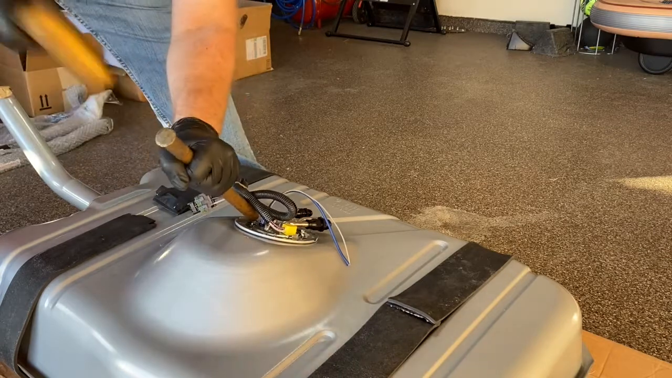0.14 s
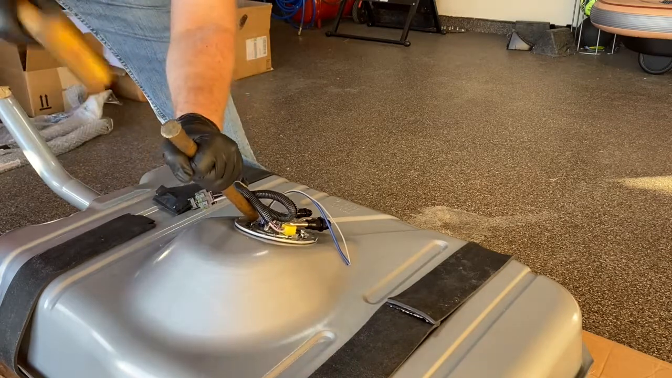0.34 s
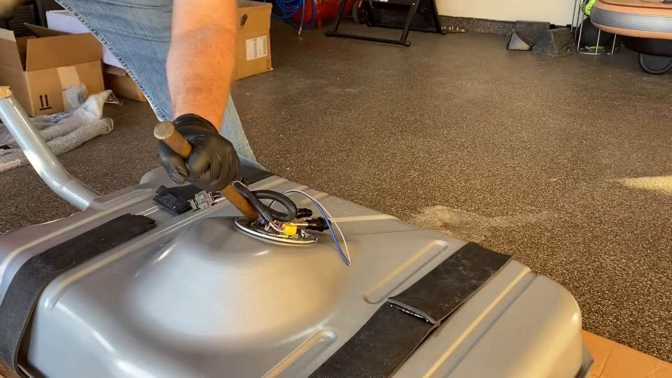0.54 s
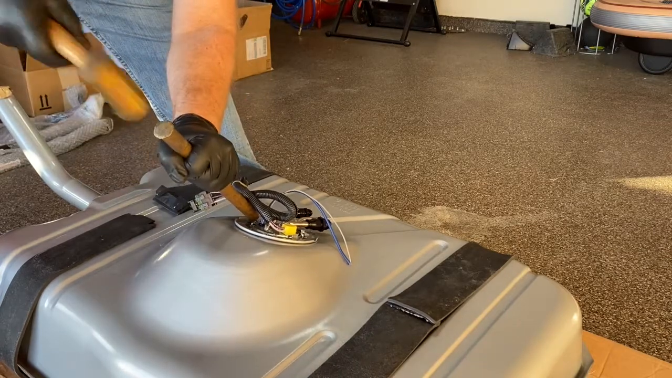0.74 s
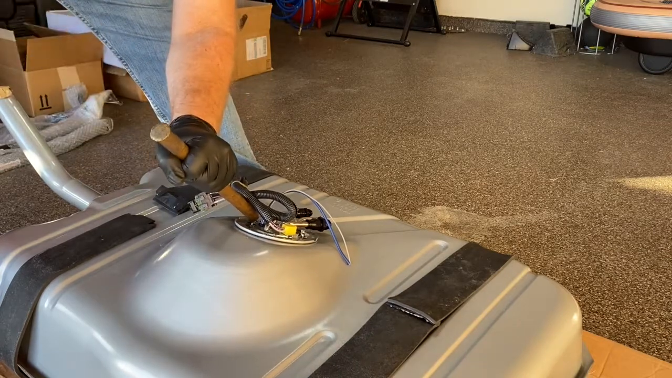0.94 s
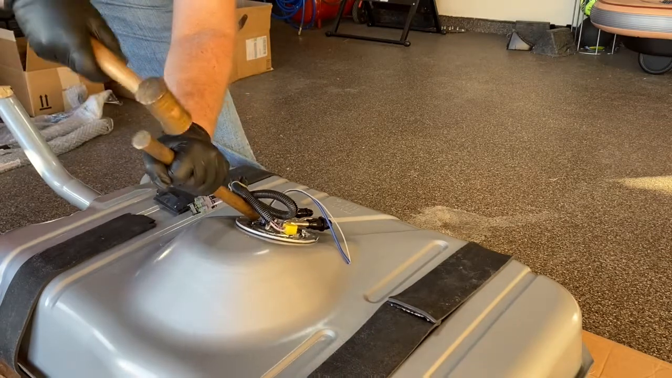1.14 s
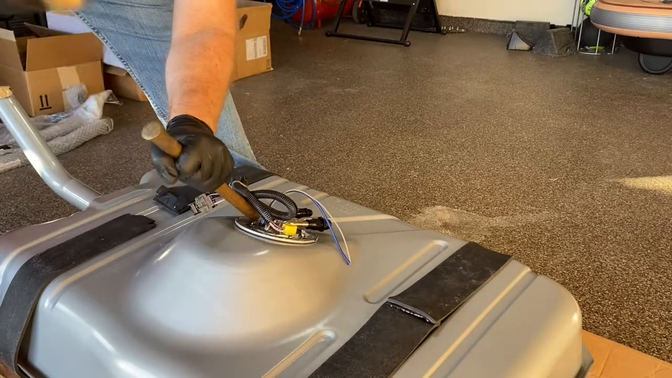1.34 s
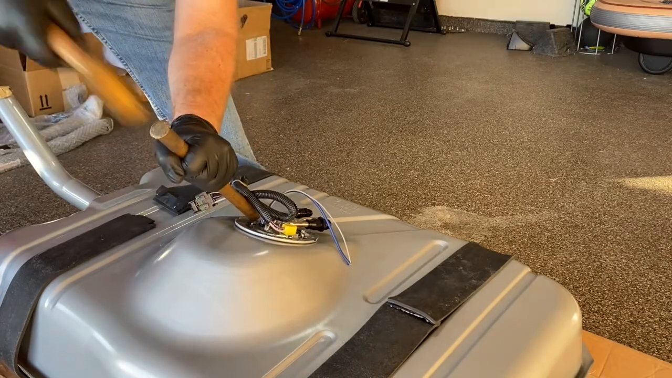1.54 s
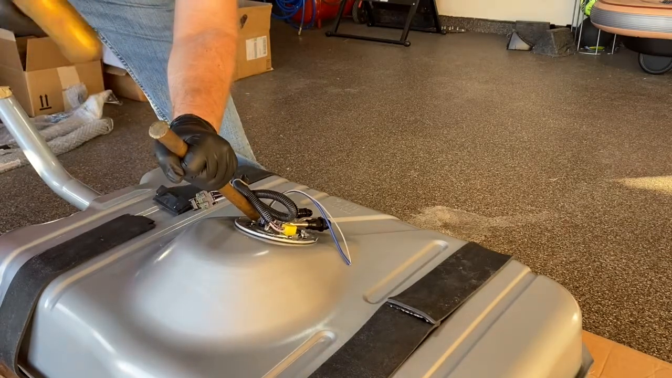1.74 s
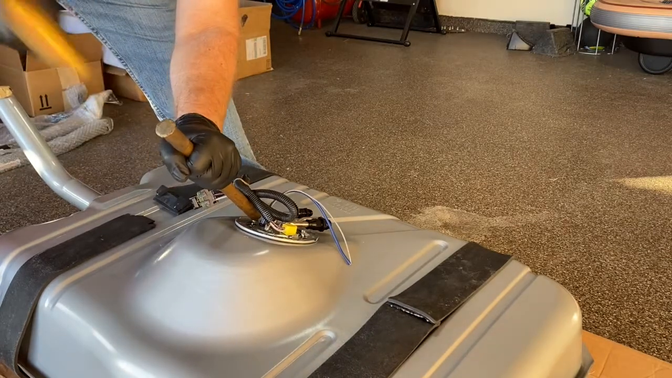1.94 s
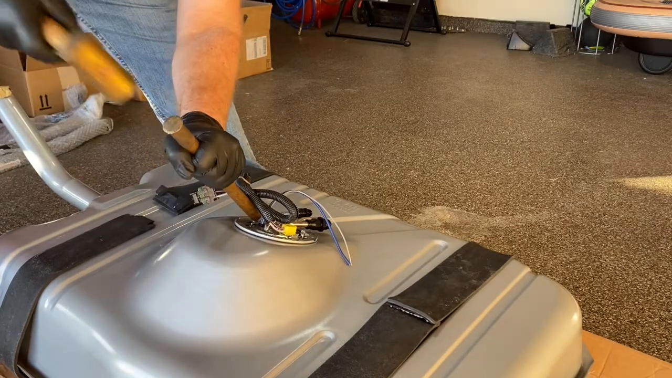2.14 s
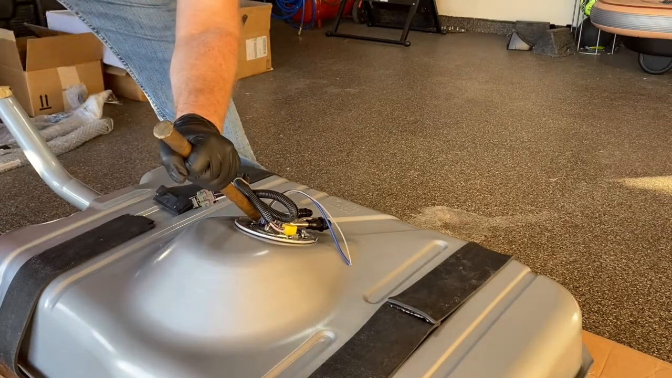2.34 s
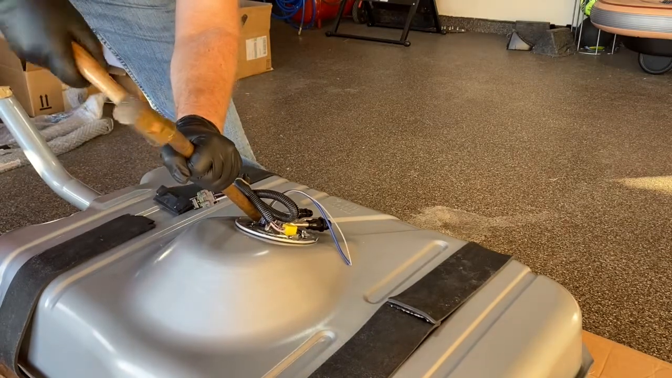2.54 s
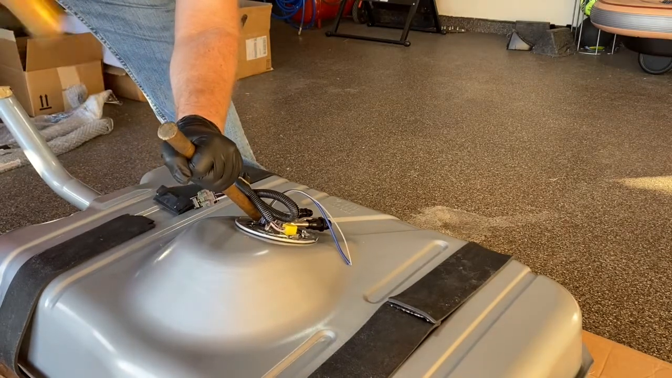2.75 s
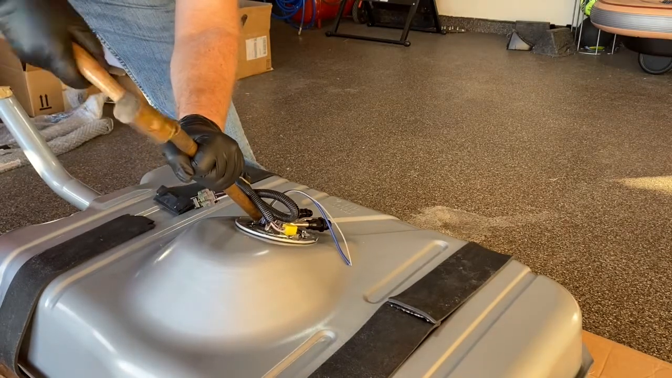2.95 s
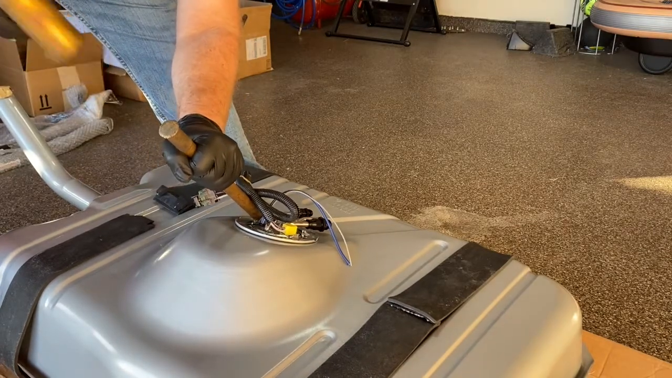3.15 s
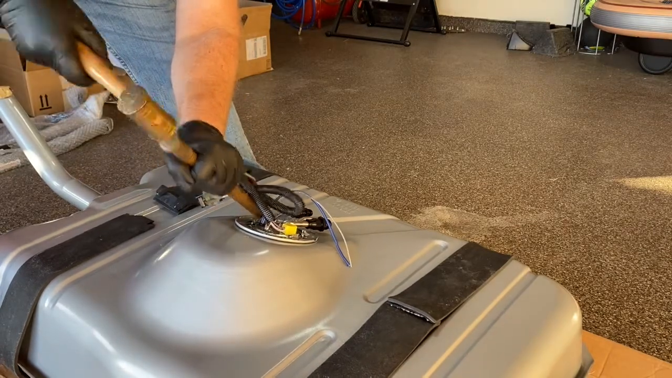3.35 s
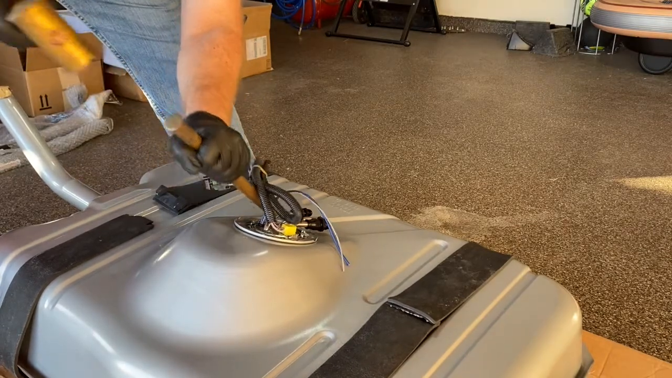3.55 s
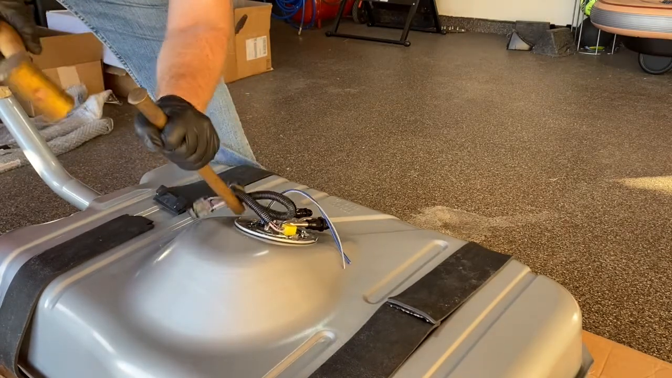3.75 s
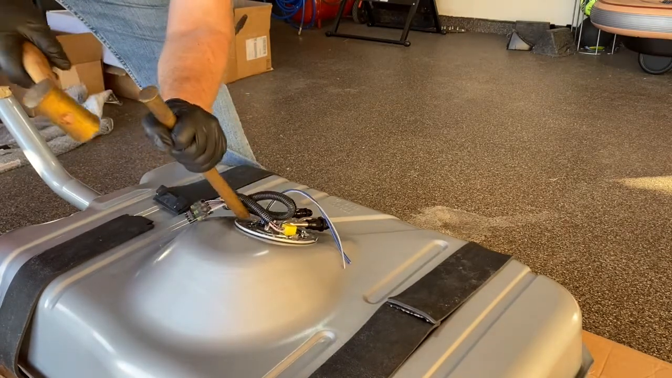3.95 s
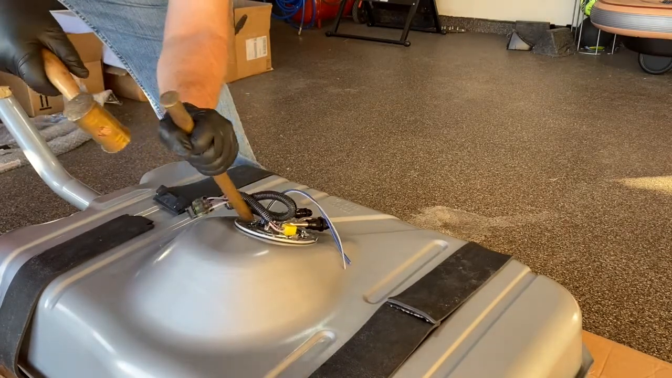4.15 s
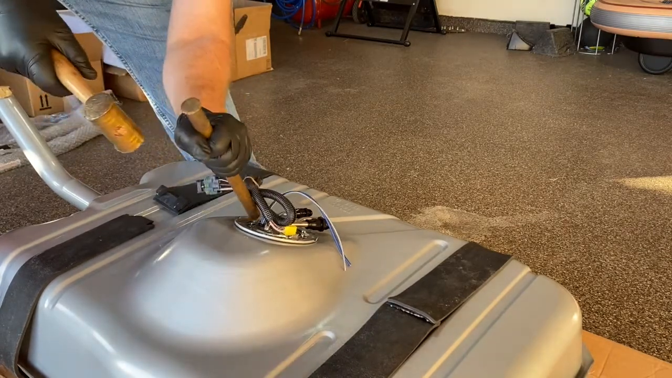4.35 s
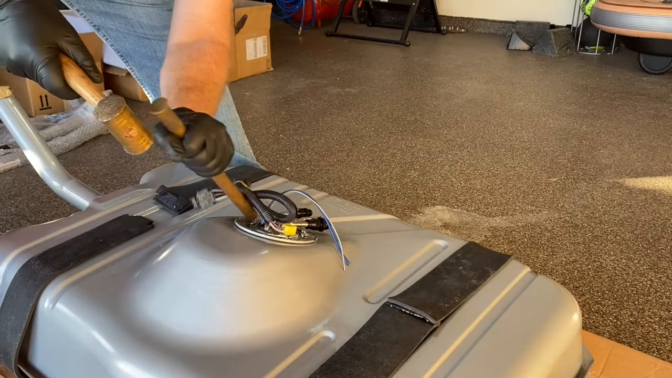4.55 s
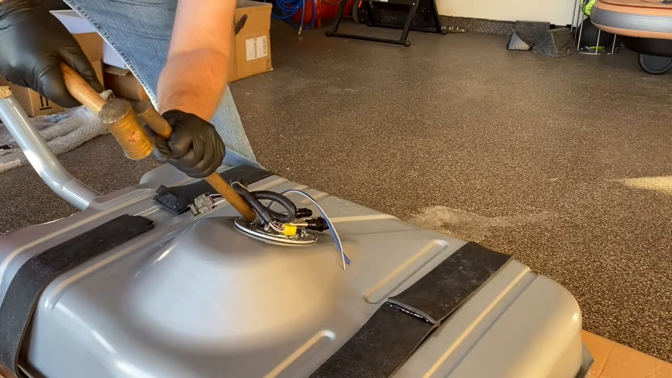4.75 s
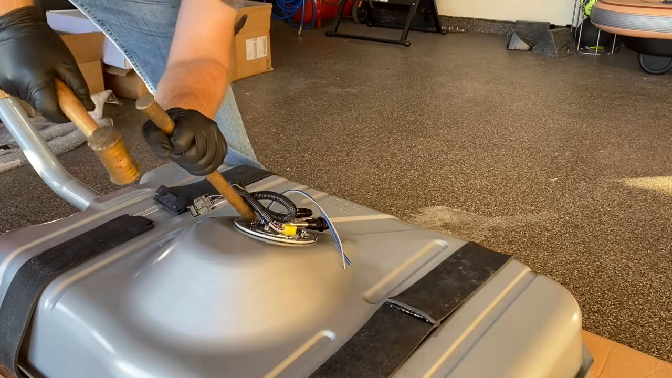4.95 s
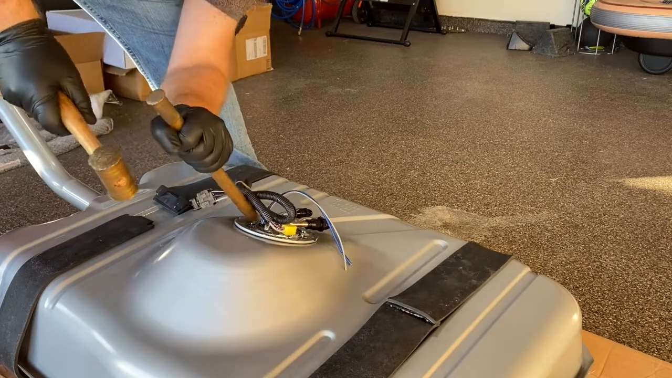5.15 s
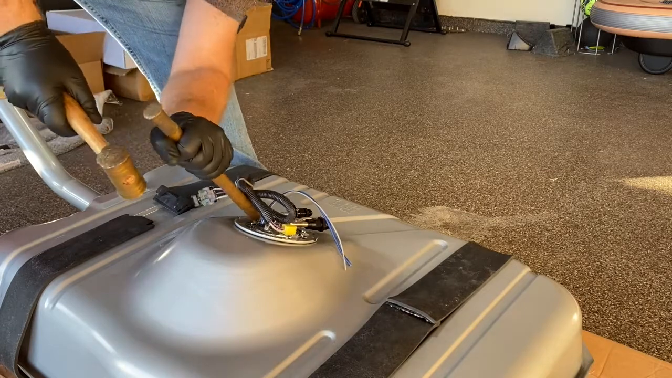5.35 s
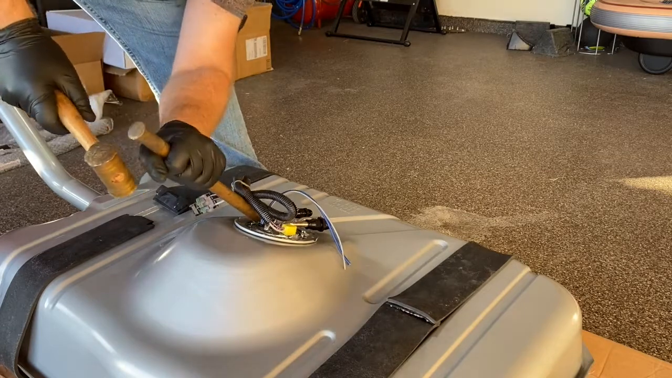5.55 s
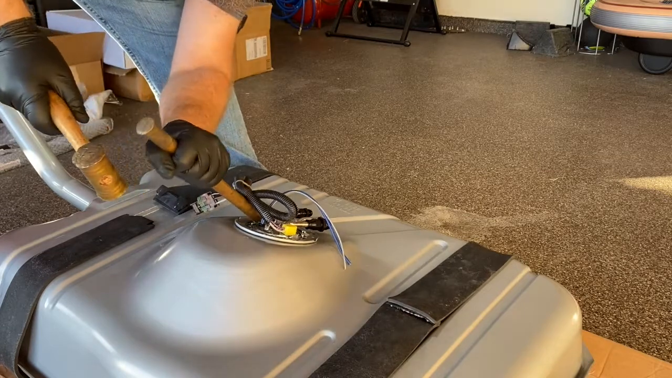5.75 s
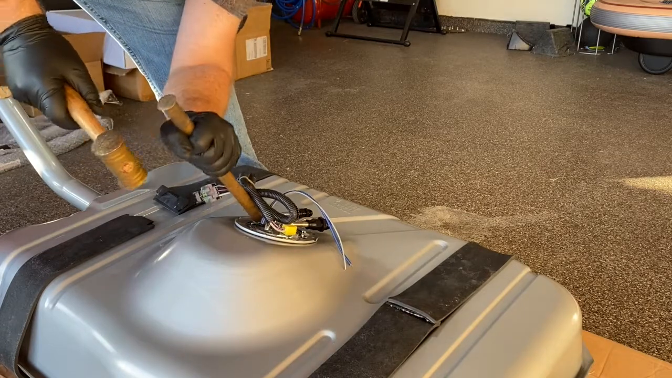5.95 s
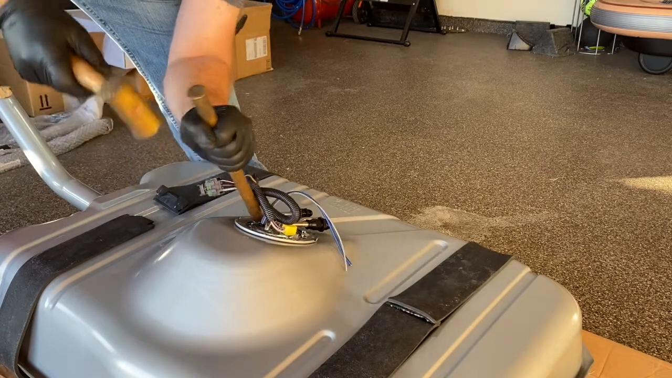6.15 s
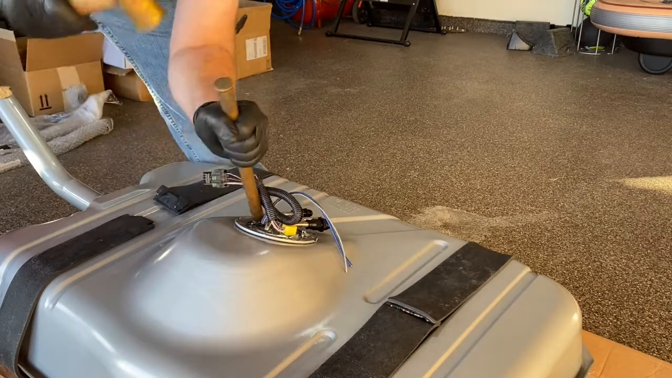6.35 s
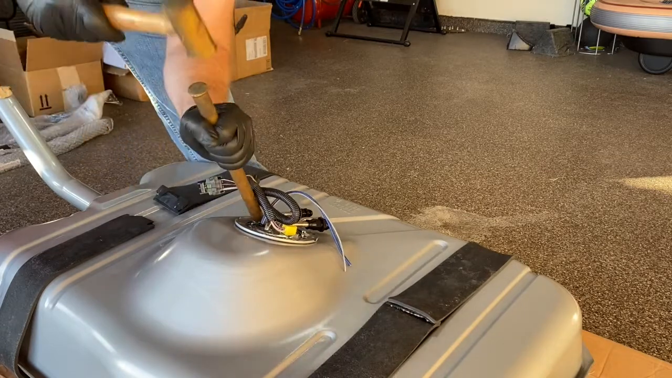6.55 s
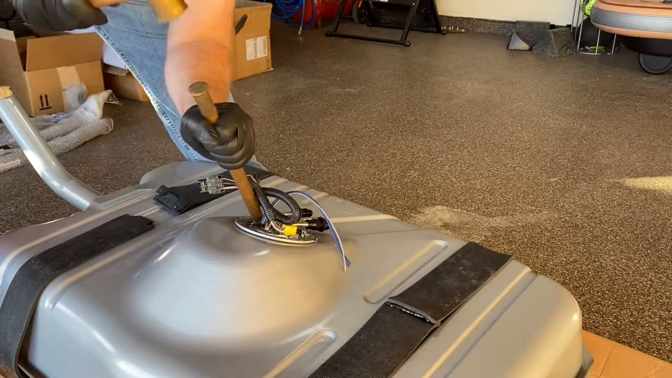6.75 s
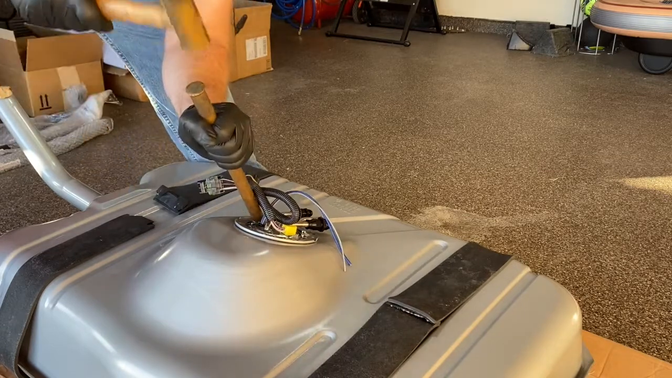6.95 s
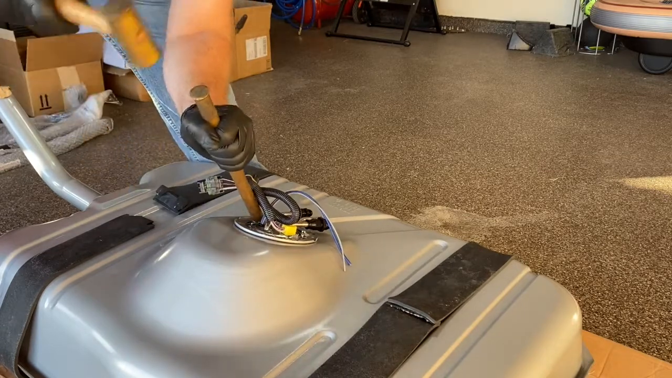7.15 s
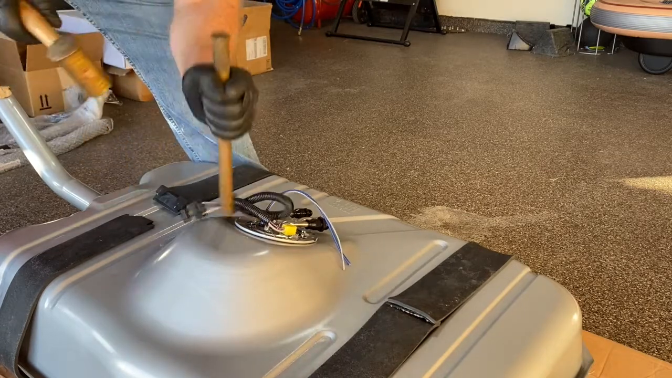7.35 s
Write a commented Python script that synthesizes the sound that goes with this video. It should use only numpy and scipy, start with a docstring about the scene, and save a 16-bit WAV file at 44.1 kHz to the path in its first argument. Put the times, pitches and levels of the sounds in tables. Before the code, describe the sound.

A brass hammer hits a steel punch on a sheet-metal tank in a live garage. Eight hard, bright blows come about twice a second, each a sharp crack with high ringing and a hollow tank clank. The last ends in a brief clattering bounce. Then dull knocks and tiny scrapes, a lighter tap, and two soft knocks over a low rumble. Close microphone, quiet room air.

```python
"""Over quiet room air and a thin whine, a brass hammer drives a steel punch against the lock ring
of a sheet-metal fuel tank in a garage: eight hard blows, each the ringing modes of hammer and punch
over a noisy crack and the clank of the tank. The eighth jolts the ring loose and it rattles briefly.
Soft filtered knocks and scrapes of rough noise follow as the punch is shifted and set down; it is
tapped once more, with two last knocks while the tank rocks in a low rumble."""
import sys
import numpy as np
from scipy import signal
from scipy.fft import rfft, irfft, next_fast_len
from scipy.io import wavfile
from scipy.ndimage import uniform_filter1d

SR = 44100
rng = np.random.default_rng(int(sys.argv[2]) if len(sys.argv) > 2 else 0)


def store_pcm(level_fs):
    """Save levels as 16-bit WAV."""
    pcm = np.round(np.clip(level_fs, -1, 1) * 32767).astype(np.int16)
    wavfile.write(sys.argv[1], SR, np.atleast_2d(pcm).T)


N = 330309
TIME = np.arange(N) / SR  # the whole scene [s]
TAIL = np.arange(int(.7 * SR)) / SR  # the span of one struck sound [s]
FLAT = [(1000, 0)]  # an uncoloured spectrum: (frequency [Hz], level [dB per Hz])


def from_db(db):
    """Decibels to gain."""
    return 10 ** (np.asarray(db) / 20)


def unit(x):
    """Scale to energy one."""
    return x / np.sqrt(np.sum(x ** 2) + 1e-20)


def at_hz(points, hz):
    """Read a table along a logarithmic frequency axis."""
    freqs, values = np.transpose(points)
    return np.interp(np.log(np.maximum(hz, 1)), np.log(freqs), values)


def gain_curve(rows):
    """A level curve as a gain per sample, silent before its first point."""
    level_db = np.interp(TIME, *np.transpose(rows))
    return from_db(level_db) * (TIME >= rows[0][0])


def dying(t60):
    """An envelope that falls 60 dB in t60 seconds."""
    return np.exp(-np.log(1000) * TAIL / max(t60, 1e-3))


def add(track, s, sound):
    """Mix a sound in at a given time in seconds."""
    start = int(round(s * SR))
    track[start:start + len(sound)] += sound[:N - start]


def noise(spectrum):
    """Steady coloured noise of rms one."""
    size = next_fast_len(N)
    colour = from_db(at_hz(spectrum, np.fft.rfftfreq(size, 1 / SR)))
    coloured = irfft(rfft(rng.standard_normal(size)) * colour, size)[:N]
    return unit(coloured) * np.sqrt(N)


def wash(spectrum, t60s):
    """Countless overlapping modes: noise whose half-octave bands each die at their own rate."""
    hz = np.fft.rfftfreq(len(TAIL), 1 / SR)
    bins = rfft(rng.standard_normal(len(TAIL))) * from_db(at_hz(spectrum, hz))
    band = np.round(2 * np.log2(np.maximum(hz, 20)))
    total = np.zeros(len(TAIL))
    for k in np.unique(band):
        # an energy-one envelope keeps the band's energy independent of its decay
        envelope = unit(dying(at_hz(t60s, 2 ** (k / 2))))
        total += irfft(bins * (band == k), len(TAIL)) * envelope
    return unit(total)


# how long the garage rings: (frequency [Hz], t60 [s])
GARAGE_DECAY = [(60, .45), (160, 0.82), (420, 0.33), (1100, 0.46), (2900, 0.48), (5200, 0.46),
                (7800, 0.2826), (10300, 0.22), (16000, 0.17)]
EARLY_DB, EARLY_T60_S = 6.5, 0.13  # boost of the first reflections and its fading time


def reverberation(spectrum, build_s):
    """The garage's diffuse tail: it swells as reflections arrive; the nearest surfaces return most."""
    early = 1 + from_db(EARLY_DB) * dying(EARLY_T60_S)
    swell = 1 - np.exp(-TAIL / max(build_s, 1e-4))
    return unit(wash(spectrum, GARAGE_DECAY) * early * swell)


def shifted(room, change_db):
    """Arm and body move between blows, which changes part of the reflections."""
    return unit(room + from_db(change_db) * reverberation(FLAT, build_s=.006))


def burst(spectrum, t60, room_db):
    """A short dense burst of noise together with its reverberation."""
    direct = wash(spectrum, [(1000, t60)])
    return unit(direct + from_db(room_db) * reverberation(spectrum, build_s=0.0086))


def ring(modes, room, room_db, rise_s):
    """Modes of one struck body, neighbours in opposite sense, heard directly and through the garage."""
    direct = np.zeros(len(TAIL))
    for k, (hz, db, t60) in enumerate(sorted(modes)):
        mode = unit(np.sin(2 * np.pi * hz * TAIL) * dying(t60))
        direct += (-1) ** k * from_db(db) * mode
    direct = unit(direct * (1 - np.exp(-TAIL / max(rise_s, 1e-5))))
    reflected = unit(signal.fftconvolve(direct, room)[:len(TAIL)])
    return unit(direct + from_db(room_db) * reflected)


# colour of the room air: (frequency [Hz], level [dB per Hz])
AIR_COLOUR = [(12, -29), (20, 4.5), (41, 4.5), (65, -4.5), (95, -4), (158, -7.5), (355, -8.5), (408, -7),
              (456, -12.5), (510, -10.5), (1050, -14), (1180, -13.5), (5320, -17.5), (12000, -17.5),
              (15800, -19.5)]
AIR_DB = -67  # rms level
WHINE_HZ, WHINE_DB = 11970, -84  # pitch and rms level


def background():
    """Quiet room air as steady coloured noise, and a thin, faint whine as one sine."""
    whine = np.sqrt(2) * np.sin(2 * np.pi * WHINE_HZ * TIME)
    return from_db(AIR_DB) * noise(AIR_COLOUR) + from_db(WHINE_DB) * whine


# the tank rocking on its cardboard: (time [s], level [dB])
ROCKING_LEVEL = [(7.0, -78), (7.096, -67), (7.134, -62), (7.29, -70), (7.33, -61.5), (7.49, -61)]
# colour of the rocking: (frequency [Hz], level [dB per Hz])
RUMBLE_COLOUR = [(20, -7), (60, -1.5), (110, -14.5), (220, -18.5), (450, -24), (1500, -40.5)]


def rocking():
    """The tank rocks under the hand: low noise following a level curve."""
    return gain_curve(ROCKING_LEVEL) * noise(RUMBLE_COLOUR)


SLIDE_SWELL_DB_PER_S, SLIDE_FADE_DB_PER_S = 160, 110


def slide(s, db):
    """A slide gathers speed, then slows: its gain per sample."""
    t = TIME - s
    return from_db(db - np.maximum(-SLIDE_SWELL_DB_PER_S * t, SLIDE_FADE_DB_PER_S * t))


# short slides of the punch tip over the ring: (time of the fastest moment [s], level [dB])
TIP_SLIDES = [(3.715, -62.5), (3.96, -64.5), (4.19, -63.5), (5.11, -64), (5.345, -65.5), (7.115, -64),
              (7.18, -64)]
# colour of the dragging tip: (frequency [Hz], level [dB per Hz])
DRAG_COLOUR = [(60, -7), (160, -0.5), (400, 1.5), (700, -6.5), (1150, -4), (1600, -10.5), (2300, -13.5),
               (4000, -21.5), (16000, -26.5)]


def scrapes(rough_db):
    """The tip sticks and slips as it drags: noise whose level wavers at random within each slide."""
    slips = uniform_filter1d(rng.standard_normal(N), size=400)  # smoothed over 9 ms
    slips = unit(slips) * np.sqrt(N)
    speed = sum(slide(s, db) for s, db in TIP_SLIDES)
    return speed * from_db(rough_db * slips) * noise(DRAG_COLOUR)


# the tip knocking on its seat: (frequency [Hz], level [dB per Hz])
SEAT_COLOUR = [(100, -28), (165, 10.5), (280, -3), (400, -2), (540, -47), (720, 9), (1100, 7), (1600, -4.5),
               (2200, 2), (4000, 5.5), (16000, -25)]


def soft_knock(panels, bright_hz):
    """A soft contact stirs only the tank's lower modes and is too light to move it as a whole."""
    soft = signal.butter(3, bright_hz, fs=SR, output="sos")
    light = signal.butter(2, 120, "high", fs=SR, output="sos")
    seat = wash(SEAT_COLOUR, [(1000, .022)]) + from_db(-2) * reverberation(SEAT_COLOUR, build_s=.004)
    return unit(signal.sosfilt(np.vstack([soft, light]), from_db(4) * panels + seat))


# colour of steel and brass in contact: (frequency [Hz], level [dB per Hz])
CRACK_COLOUR = [(15, -53.5), (500, -18), (2000, -8), (4200, -7), (5600, 1.5), (6500, -0.5), (8500, -1.5),
                (10500, 1.5), (11500, -4.5), (12600, -10), (14000, -12), (15400, -9.5), (16000, -36)]


def steel_tick():
    """The small bright click of steel meeting steel."""
    return burst(CRACK_COLOUR, t60=0.028, room_db=-4.5)


def contact_crack():
    """The dense bright crack of the hammer meeting the punch."""
    return burst(CRACK_COLOUR, t60=.032, room_db=-4)


# light knocks of the punch on ring and tank:
# (time [s], knock level [dB], brightness as low-pass cutoff [Hz], steel tick level [dB])
LIGHT_KNOCKS = [(3.670, -31.5, 1700, -47), (3.9154, -34.5, 1600, -48), (3.948, -38, 1217, -41),
                (3.983, -39, 3800, -41), (4.076, -37.5, 1200, -50), (4.2015, -18.5, 1290, -42),
                (4.235, -27.5, 1020, -51), (4.3792, -24, 2140, -50), (4.7496, -32.5, 1610, -44),
                (5.1392, -22, 1180, -49), (5.3393, -23, 1350, -41), (5.4506, -36, 996, -51),
                (7.1428, -25, 1200, -38), (7.2106, -30.5, 1994, -39)]


def knocks(panels):
    """The punch is set down on the tank and nudged into place: dull knocks with bright ticks."""
    out = np.zeros(N)
    for s, knock_db, bright_hz, tick_db in LIGHT_KNOCKS:
        add(out, s, from_db(knock_db) * soft_knock(panels, bright_hz))
        add(out, s, from_db(tick_db) * steel_tick())
    return out


# the loosened lock ring bouncing on its seat:
# (time [s], ring clank level [dB], tank knock level [dB], steel tick level [dB])
RING_BOUNCES = [(3.2353, -16, -9.5, -20), (3.283, -15, -19.5, -22), (3.334, -37, -33, -46),
                (3.388, -34, -28.5, -41)]
# modes of the loose lock ring: (frequency [Hz], level [dB], t60 [s])
LOCK_RING_MODES = [(490, -4, 0.023), (663, -4, 0.039), (774, 2.5, 0.027), (817, -4, 0.057),
                   (1040, -11, 0.03), (1200, -19, 0.027), (1980, -15, .04)]


def rattle(panels, room):
    """Once free, the lock ring bounces a few times with a hollow clank of its own."""
    out = np.zeros(N)
    for s, clank_db, knock_db, tick_db in RING_BOUNCES:
        clank = ring(LOCK_RING_MODES, room, room_db=-4.5, rise_s=0.0013)
        add(out, s, from_db(clank_db) * clank)
        add(out, s, from_db(knock_db) * soft_knock(panels, bright_hz=2860))
        add(out, s, from_db(tick_db) * steel_tick())
    return out


# modes of the tank's panels: (frequency [Hz], level [dB], t60 [s])
TANK_MODES = [(56.8, -10.5, 0.25), (83, -7.5, .25), (149, 2, .3), (172, -1.5, 0.48), (215.7, 1.5, 0.3),
              (237.2, -0.5, .25), (260.8, -10.5, 0.64), (285.8, -1, .25), (336, -7.5, .25),
              (400.6, -3.5, 0.47), (412, -9, 0.78), (441, 4, 0.26), (537, -4, 0.42), (610, -6.5, 0.067),
              (635, -5, 0.091), (648, -4, 0.2), (730, 1.5, 0.12), (812, -9.5, 0.81), (882, -2, 0.26),
              (994, -3.5, 0.17), (1001, -5, 0.17), (1073, -4, 0.15), (1128, -2, 0.17), (1220, -2.5, .2),
              (1480, -22, 0.12), (1702, -7, 0.17), (2000, -4.5, 0.4), (2180, -7.5, .2)]
# colour of the tank's dense clank: (frequency [Hz], level [dB per Hz])
CLANK_COLOUR = [(15, -47.5), (35, -23), (70, 1), (115, -7.5), (160, -5), (400, 1), (800, -1), (1200, 0.5),
                (1420, -4.5), (1750, -3.5), (2200, -2.5), (3200, -3.5), (4000, -7.5), (5500, -14),
                (8000, -38), (16000, -38)]


def tank_panels(room):
    """Sheet metal: a dense burst of crowded modes plus the panel modes that stand out."""
    dense_modes = burst(CLANK_COLOUR, t60=.028, room_db=3)
    clear_modes = ring(TANK_MODES, room, room_db=-18.0, rise_s=0.00077)
    return unit(dense_modes + from_db(-4.0) * clear_modes)


def tank_clank(panels, fresh_db):
    """The tank answers each blow alike, apart from a share that depends on the exact spot."""
    return unit(panels + from_db(fresh_db) * burst(CLANK_COLOUR, t60=.04, room_db=2))


def answer_db(response, force_db, slant):
    """Level of one part for a blow of a given force and slant."""
    full_db, steepness, glancing_db = response
    return full_db + steepness * force_db + glancing_db * slant


# hammer blows: (time [s], force [dB], tank level relative to force [dB],
# slant [0 square - 1 glancing], punch tip level relative to force [dB])
HAMMER_BLOWS = [(0.0824, -4, -5.5, .05, -13), (0.5288, -2.5, -3.5, .22, -16), (0.9737, -4, 0, 1, -14),
                (1.4586, -2, -3, 0.54, -10), (1.8826, -4, -1, 0.19, -7), (2.4238, 0, -3.5, 0.34, -9),
                (2.8198, -1.73, -1, 0.14, -25), (3.1961, -5, 0.6, 0.25, 1.5), (6.751, -16, 4.5, .3, -7)]
# modes of hammer head and punch: (frequency [Hz], level [dB], t60 [s])
HEAD_MODES = [(4560, -19, .05), (4810, -12, .08), (4960, -11, .04), (5052, -5, .06), (5115, -6, .04),
              (5230, -5, .035), (5302, -5, .05), (5365, -9, .07), (5440, -13, .04), (5552, -14, .06),
              (5720, -17, .05), (5168, 0, .075)]
BENDING_MODES = [(1575, -9, .07), (2860, -4, .04), (2915, -4, .04), (3020, -7, .04), (4700, -5, .04),
                 (4785, -3, .06), (2961, -1.5, .06)]
TIP_MODES = [(7030, 0, .025)]
OVERTONE_MODES = [(9280, -6, .025), (9430, -10, .025), (9355, 0, .05)]
LENGTHWISE_MODES = [(10062, -11, .03), (10220, -10, .025), (10420, -13, .025), (10572, -16, .04),
                    (15450, -25, .02), (10316, 0, .062)]
# how each part answers a blow: (level at a square blow of 0 dB force [dB],
# steepness [dB per dB of force], change at a fully glancing blow [dB])
CRACK_ANSWER = (-0.84, 1.05, 0)
HEAD_ANSWER = (5.4, 1.1, -6)
BENDING_ANSWER = (-14, 0.92, 15)  # a glancing blow bends the punch
OVERTONE_ANSWER = (-1, .8, -14)
# only a hard, square blow is short enough to ring the punch end to end
LENGTHWISE_ANSWER = (11.66, 2.6, -12)


def blows(panels, room):
    """Force and slant of each blow set the levels of contact, hammer head and punch over the tank."""
    out = np.zeros(N)
    for s, force_db, tank_db, slant, tip_db in HAMMER_BLOWS:
        walls = shifted(room, change_db=4)
        tank = tank_clank(panels, fresh_db=-10.5)
        tip = ring(TIP_MODES, walls, room_db=-14.5, rise_s=0.00049)
        add(out, s, from_db(force_db + tank_db) * tank)
        add(out, s, from_db(force_db + tip_db) * tip)
        answering_parts = [
            (contact_crack(), CRACK_ANSWER),
            (ring(HEAD_MODES, walls, room_db=0, rise_s=.0015), HEAD_ANSWER),
            (ring(BENDING_MODES, walls, room_db=4, rise_s=0.00079), BENDING_ANSWER),
            (ring(OVERTONE_MODES, walls, room_db=-11, rise_s=0.00044), OVERTONE_ANSWER),
            (ring(LENGTHWISE_MODES, walls, room_db=-11, rise_s=0.00017), LENGTHWISE_ANSWER)]
        for part, response in answering_parts:
            add(out, s, from_db(answer_db(response, force_db, slant)) * part)
    return out


def scene():
    """Tank and microphone stay put, so all blows share one set of panel modes and one basic room."""
    room = reverberation(FLAT, build_s=.006)
    panels = tank_panels(room)
    handling = rocking() + scrapes(rough_db=2.0) + knocks(panels)
    mix = background() + handling + rattle(panels, room) + blows(panels, room)
    return mix[None, :]


def record(dry):
    """The small microphone loses the deepest bass, and the top is cut steeply."""
    bass_cut = signal.butter(2, 34, "high", fs=SR, output="sos")
    top_cut = signal.ellip(12, .1, 80, 15900, fs=SR, output="sos")  # .1 dB ripple, 80 dB down
    return signal.sosfilt(top_cut, signal.sosfilt(bass_cut, dry))


dry = scene()
out = record(dry)
store_pcm(out)
```